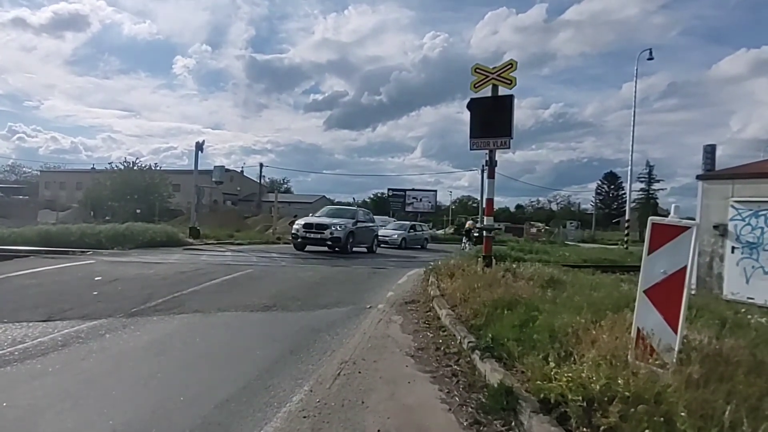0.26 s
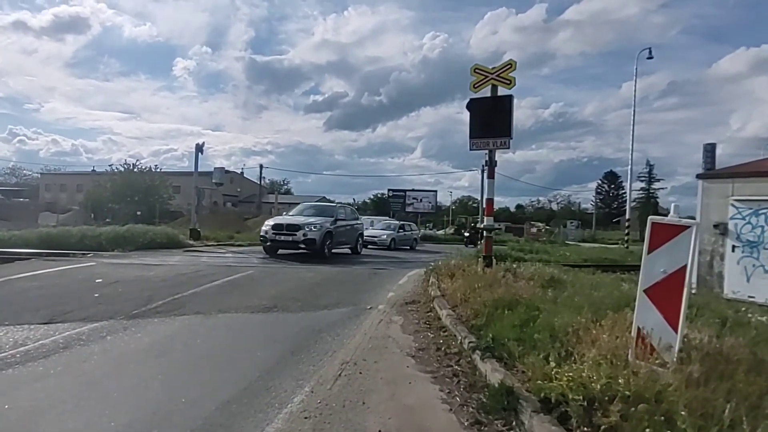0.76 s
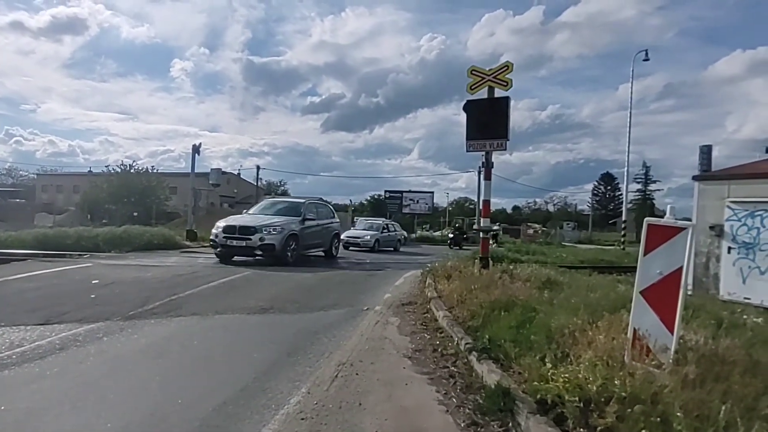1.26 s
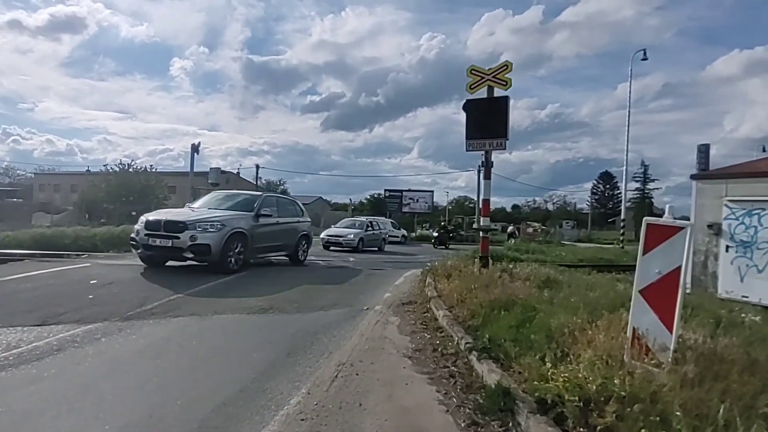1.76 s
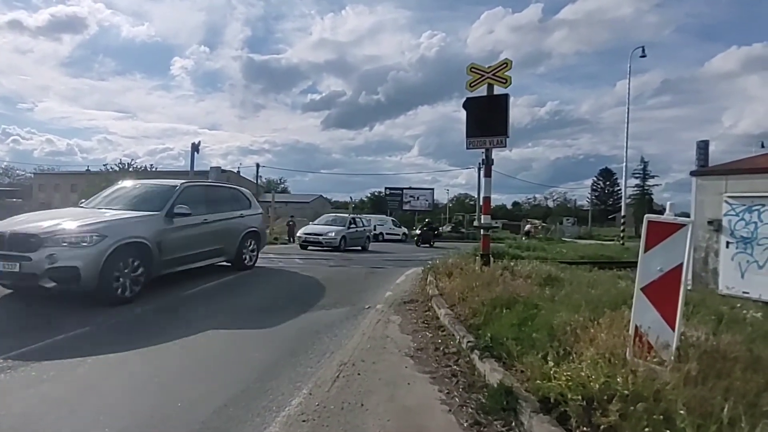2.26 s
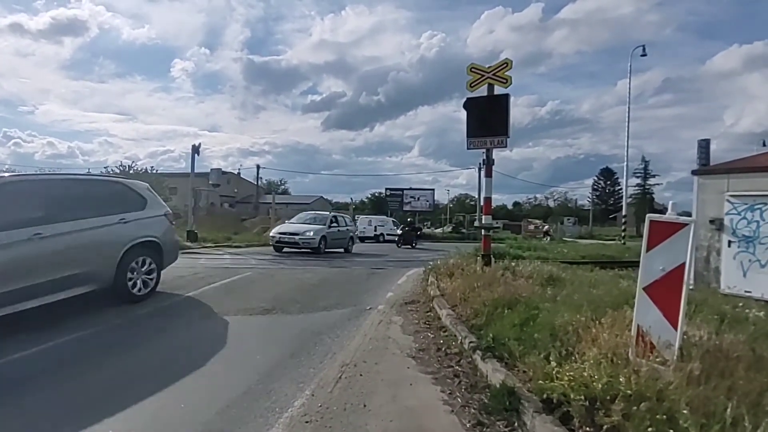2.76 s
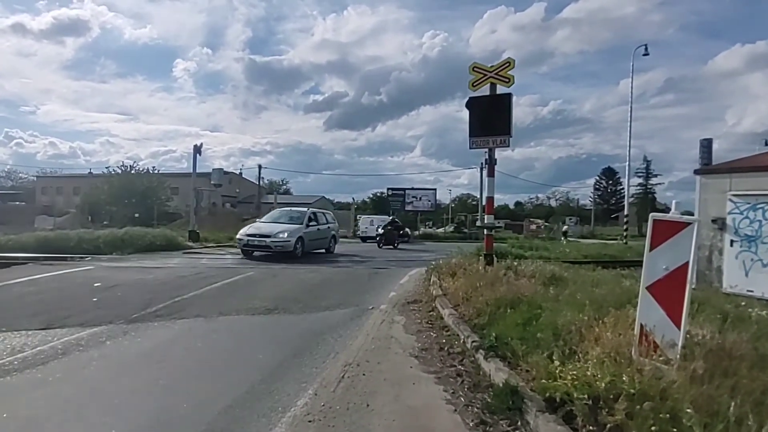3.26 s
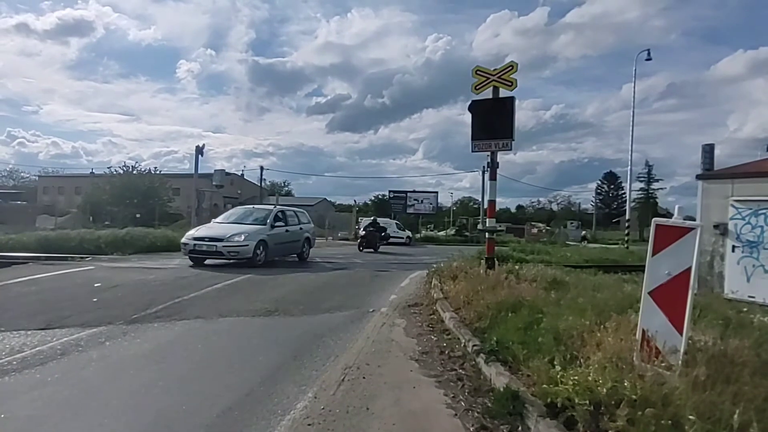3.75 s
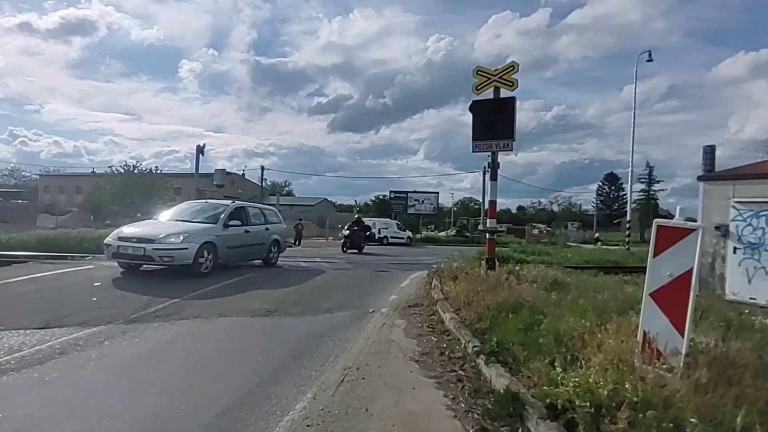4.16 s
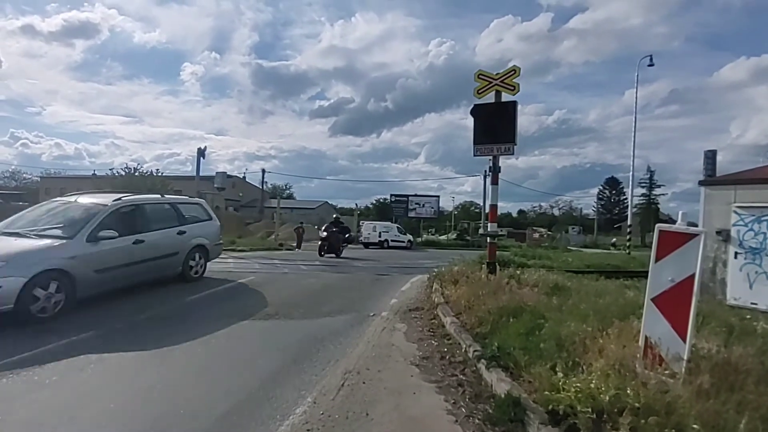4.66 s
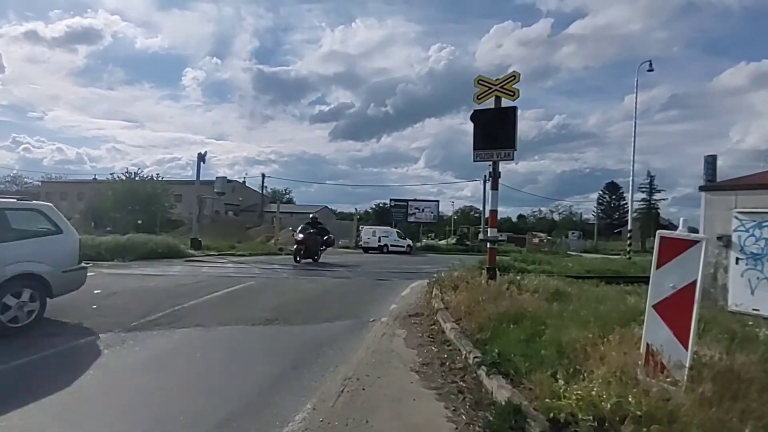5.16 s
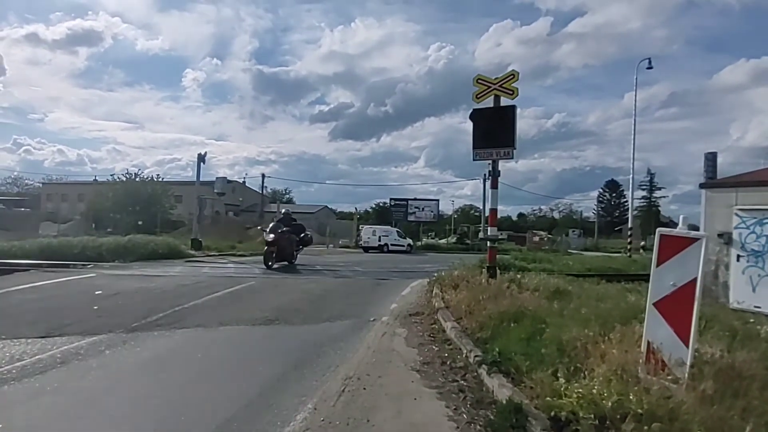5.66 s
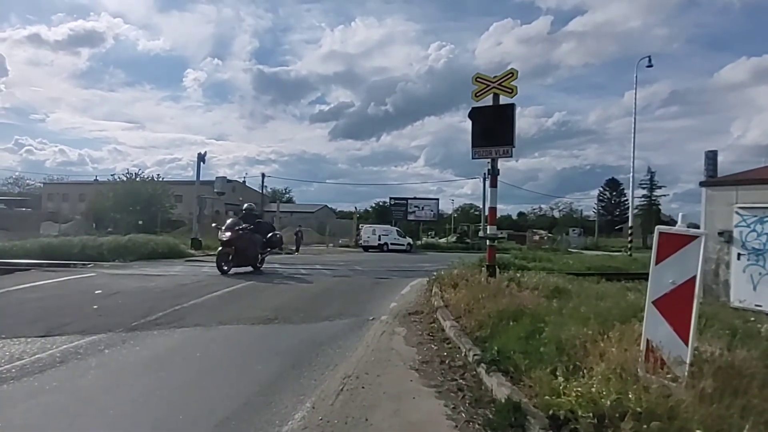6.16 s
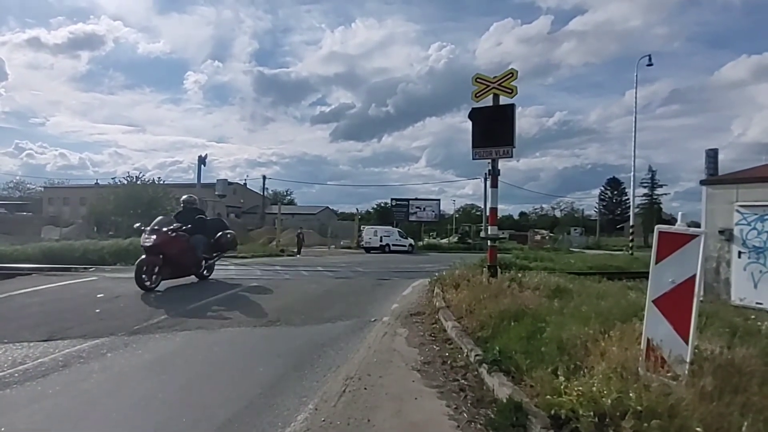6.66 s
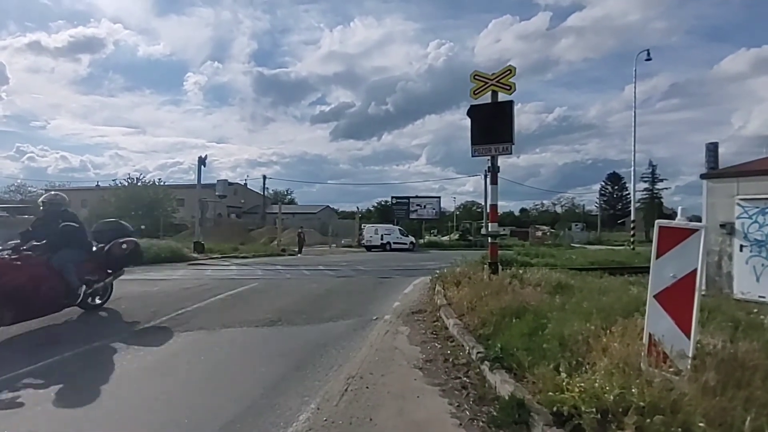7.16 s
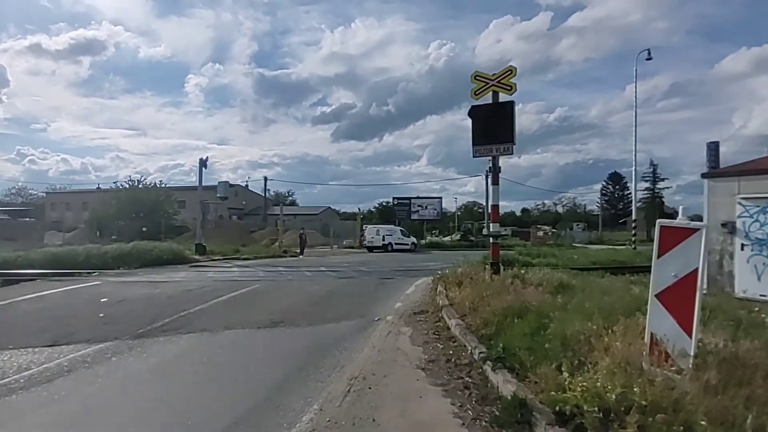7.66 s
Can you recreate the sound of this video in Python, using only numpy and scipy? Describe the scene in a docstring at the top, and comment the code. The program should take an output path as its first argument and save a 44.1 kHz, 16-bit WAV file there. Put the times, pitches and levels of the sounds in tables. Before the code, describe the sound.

Outdoors beside a level crossing, with a stationary stereo microphone close to the road. A large car's low engine dips for a gear change, then pulls and passes on the left with drumming, singing tyres and wheel knocks. A rattlier estate car follows with fuller tyre roar and hiss. Last, a motorcycle thumps over the rails and goes by, its deep exhaust throbbing, surging and booming as it leaves.

```python
"""Engines hum up in pitch and tyres roar and drum as a large car, an estate car and a motorcycle pull away
over a level crossing and pass on the left; wheels knock and the motorcycle's exhaust throbs.
Engines are sums of wavering firing lines, with rasp and exhaust puffs made from shaped noise and pulses.
Tyres are swelling bands of noise with thin singing lines; knocks are decaying sines with a noisy crack.
A moving comb of notches, the road's reflection, colours the tyres, rasp and hiss."""
import sys
import numpy as np
from scipy import signal
from scipy.fft import rfft, irfft, next_fast_len
from scipy.io import wavfile
from scipy.ndimage import map_coordinates

SR = 44100
rng = np.random.default_rng(int(sys.argv[2]) if len(sys.argv) > 2 else 0)


def file_out(sig):
    """Save sig as 16-bit WAV at sys.argv[1]."""
    # one column per channel
    cols = np.atleast_2d(sig).T
    # limit, then scale
    lim = np.clip(cols, -1, 1)
    pcm = np.round(lim * 32767).astype(np.int16)
    wavfile.write(sys.argv[1], SR, pcm)


N = 347949

# Levels in these tables are taken before the trims set in scene().
# Engine pitch: the large car sinks, climbs and levels off; the estate car climbs; the motorcycle climbs
# and eases at the end. Each row: time in seconds, pitch in Hz.
LARGE_CAR_PITCH = [(0, 84.7), (.25, 77.7), (.48, 67.5), (1, 85.05), (1.9, 98.02), (3.5, 100.3)]
ESTATE_CAR_PITCH = [(3.3, 56.68), (4, 65.44), (5, 74.57), (5.4, 79.95), (5.85, 81.9), (6.35, 88.3)]
MOTORCYCLE_PITCH = [(5.4, 47.3), (5.9, 48), (6.2, 50.4), (6.6, 53.45), (7, 58.04), (7.3, 61.3),
                    (7.48, 62.96), (7.66, 68.25), (7.89, 66.5)]
# Engine firing lines. Each row: multiple of the pitch, level in dB while approaching, level in dB once past.
LARGE_CAR_ORDERS = [(1, 1.5, -4), (1.5, -4.5, -31), (2, -8.5, 4.5), (2.5, -6.5, -3), (3, -19, -8.5),
                    (4, -14, -7), (5, -22, -9)]
ESTATE_CAR_ORDERS = [(1, -5.5, 5.5), (2, -2.5, 1.5), (3, 0.5, 0.5), (4, -10, -6), (5, -22, -12.5),
                     (6, -4, -11)]
MOTORCYCLE_ORDERS = [(2, 0, -6), (3, -12.5, -8.5), (4, -5.5, -12.5), (5, -15, -23), (6, -23.5, -19),
                     (7, -25.5, -18.5), (8, -21, -24.5)]
# The motorcycle's exhaust boom as it comes to point back. Each row: as for the firing lines.
BOOM_ORDERS = [(1, -7.5, 2.5), (1.27, -19, 4)]
# The large car's engine lifts off for a gear change, then pulls again. Each row: time in seconds, gain in dB.
GEAR_CHANGE = [(0, 3), (.2, 5.5), (.4, -2.5), (.56, -5), (.8, -0.5), (1.3, 2)]
# The motorcycle's engine note dips and surges. Each row: time in seconds, gain in dB.
SURGE = [(5.4, 0.5), (5.88, -3.5), (5.98, 1.5), (6.07, -7.5), (6.2, -2.5), (6.6, 2), (6.68, -4),
         (6.85, 1.5), (7.1, -0.5), (7.44, -0.5), (7.52, -3.5), (7.62, 2), (7.71, -1.5), (7.8, 2.5)]
DRONE_HZ, DRONE_ENDS_S = 165.3, 3.4  # a waiting engine's drone

# Exhaust throbs, one from the estate car, the rest from the motorcycle.
# Each row: loudest moment, rise and fall in seconds, level in dB.
THROBS = [(4.9, 0.46, 0.39, -37.5), (6.88, 0.075, .1, -30.5), (7.17, 0.08, 0.19, -30.5),
          (7.41, 0.095, 0.1, -27.5), (7.631, 0.082, 0.075, -27.5), (7.86, 0.23, .2, -26.5)]
# Resonance of the exhaust pipe. Each row: frequency in Hz, relative level in dB.
PIPE = [(25, -36), (45, -31), (62, -22), (82, -2), (110, -4.5), (160, -11.5), (240, -13.5), (300, -19.5),
        (450, -26.5), (800, -38.5), (2000, -77)]
# Spectrum of the motorcycle's drive sizzle, also used for grit. Each row: frequency in Hz, relative dB per Hz.
DRIVE = [(4500, -29), (5800, -13), (6700, -3), (8200, 3), (9700, -18), (12000, -3), (15500, -3.5)]
# The motorcycle's gear whine. Each row: time in seconds, pitch in Hz.
GEAR_PITCH = [(6.75, 1620), (6.97, 1590), (7.15, 1665), (7.36, 1686), (7.46, 1725), (7.5, 1901),
              (7.58, 1893), (7.65, 1980), (7.72, 1890), (7.8, 1930), (7.89, 1840)]
GEAR_DB, GEAR_LEAD_S = -50.5, .00014

# Spells of engine rasp, the first two the early 3 kHz ones. Each row: start, end, release, loudest moment
# and width in seconds, level in dB, left over right in dB.
RASPS = [(0, 1.7, 0.26, 1.22, 1.13, -51.5, 2.5), (1.72, 4.02, 0.32, 2.6, 2.6, -50, 11),
         (3.38, 5.74, 0.37, 4.1, 1.5, -38.5, -2), (5.62, 6.69, 0.04, 5.97, 0.9, -36, -3.5),
         (6.799, 7.25, 0.22, 6.7, 0.76, -45.5, 12), (7.5, 8.1, .1, 7.6, 0.42, -47.5, 7)]
RASP_ATTACK_S = 0.26
FLUTTER_MULTIPLE = 2 / 3  # rate of the early 3 kHz rasp's fluttering, against the first pitch track
# Rasp spectra, the early spells' and the later ones'. Each row: frequency in Hz, relative dB per Hz.
EARLY_RASP = [(1900, -30), (2350, -6), (2650, 9), (2950, 6.5), (3250, 2), (3520, -3.5), (3800, -32),
              (5000, -63)]
LATER_RASP = [(1500, -15.5), (2200, -14.5), (2650, -1.5), (2850, -2), (3020, -0.5), (3200, -2.5),
              (3450, -5.5), (3850, -12), (4300, -26), (6000, -65)]
# Engine parts ringing under load. Each row: loudest moment, rise and fall in seconds,
# level in dB, centre in Hz, climb in Hz per second, right over left in dB, width in Hz.
RINGS = [(.085, .015, 0.022, -52, 2020, 0, -0.5, 120), (1, 0.54, .4, -64, 2086, 1, -3, 71),
         (1.171, .3, 0.16, -53, 1530, 61, -3, 44.85), (1.162, .25, .2, -54.5, 3070, 0, -7, 70.5),
         (1.74, .16, 0.2, -50, 2905, 0.5, -4, 299), (3.501, 0.22, 0.98, -43.5, 3058, -59.5, -6, 120),
         (6.63, 0.1, 0.1, -47.5, 3054, 0, 1, 349)]

# Tyre swells on the rails, alongside and behind. Each row: loudest moment, rise and fall in seconds
# (drumming falls more slowly), drumming level in dB, tread roar level in dB, roar's right over left in dB.
TYRES = [(1.66, 0.16, 0.19, -41, -46.5, 2), (2.65, 1.386, 1, -35, -40, 3.5),
         (4.402, 1.46, 1.27, -35, -36.5, 3), (5.98, 0.19, 0.12, -53, -39, 3),
         (6.75, 1.76, 0.44, -35, -38.5, 2.5), (7.55, 0.47, 0.3, -50, -44, -1)]
# Tyre spectra, drumming and tread roar. Each row: frequency in Hz, relative dB per Hz.
DRUM = [(20, -35), (38, -18), (55, -2), (100, 0.5), (150, 0.5), (240, 4.5), (330, -1.5), (450, -2),
        (620, -8.5), (900, -24.5), (2000, -61)]
ROAR = [(350, -28), (600, -23), (850, -1), (1150, -0.5), (1450, -6), (1800, -6.5), (2300, -9), (3200, -21),
        (4300, -40), (7000, -60)]
# Climbing bands of tyre noise. Each row: loudest moment, rise and fall in seconds, level in dB,
# centre in Hz at the loudest moment, climb in Hz per second, right over left in dB.
CLIMBS = [(1.2, 1.2, 0.86, -50.5, 1580, 167.3, -1), (3.12, 0.46, 0.59, -42.5, 2108, 399, 22),
          (4.65, .75, 0.66, -42, 1812, 451.7, 9), (5.75, .5, 0.29, -41, 2383, 200, 14),
          (7.7, .35, 0.87, -48, 1988, 249.8, 4), (3.43, .12, 0.13, -60, 3950, 1410, 5)]
# Boom of the wheel arches. Each row: as for the climbing bands.
HOLLOW = [(3.35, .4, .85, -37.5, 598, 30, 2), (5.55, 0.58, .8, -38.5, 621.2, 10, 0.5)]
# Narrow singing of gears and tread patterns. Each row: as for the climbing bands, with pitch for centre.
WHINES = [(1.2, 1.5, 0.46, -53, 903, 67.5, -3), (1.98, .09, 0.09, -38.5, 297.6, 26, 0),
          (2.9, .12, 0.12, -38, 394.3, 26, -3), (3.981, .16, 0.086, -39.5, 887, 20.5, 2),
          (4.03, .24, 0.23, -37.5, 394, 70, 0), (4.45, .12, 0.31, -42.5, 1103, 90, 2),
          (6.92, .06, 0.067, -42, 1203, 0, 6), (7.1, .16, 0.13, -37.5, 492, 100.5, 5)]
# Tread noise reaches the left port first, by more once the traffic is alongside.
FAR_LEAD_S, NEAR_LEAD_S = .00008, .00025
# The large car's tyre chord. Each row: highest pitch in Hz, level in dB.
CHORD = [(340, -44), (425, -44), (545, -45.5), (590, -45), (618, -45), (665, -41), (750, -51), (840, -51)]
# Highest moment, time from it to drop by half an octave, then the swell's rise and fall.
CHORD_TOP_S, CHORD_BEND_S, CHORD_RISE_S, CHORD_FALL_S = 3.27, .72, 0.59, 0.32

# Knocks of wheels. Each row: time in seconds, # thud level in dB, thud pitch in Hz, thud 60 dB decay in
# seconds, slap level in dB.
KNOCKS = [(0.28, -27, 109, 0.18, -50), (1.004, -25, 225, 0.064, -39), (1.079, -31, 226, .03, -26),
          (2.271, -15, 285, 0.028, -15), (3.946, -26, 240, 0.025, -18), (4.0, -24, 203, 0.021, -11),
          (4.393, -12.5, 415, .018, -17), (5.913, -17, 189, .08, -23), (6.002, -7.5, 238, 0.025, -24),
          (6.035, -10, 198, 0.033, -36), (6.636, -15, 224.3, 0.084, -35.5), (6.802, -18, 305, 0.035, -16.5),
          (6.865, -16, 375, 0.044, -22)]
SLAP_HZ, SLAP_T60_S = 1000, 0.011
CRACK_DB, CRACK_T60_S, CRACK_HZ = -9, 0.011, 1600  # level against the slap, decay, low-pass corner
# Bits of grit ticking under the tyres. Each row: time in seconds, level in dB.
TICKS = [(.1, -64), (.39, -68), (1.824, -60), (6.823, -55), (7.14, -50), (7.37, -55)]
TICK_T60_S = .04

# Swells of air hiss. Each row: loudest moment, rise and fall in seconds, level in dB, right over left in dB.
HISSES = [(1.852, 0.34, 1.6, -66, 2), (3.65, 0.79, 0.46, -60, 6.5), (4.6, 0.6, 1.26, -58.5, 4),
          (6.03, 0.39, 0.2, -51, 22), (6.56, 0.16, 0.17, -61, 10), (7.7, 0.87, 1.2, -64, -8)]
FAR_HISS_DB = -79  # distant traffic, before the hiss trim
# Swells of fine sizzle. Each row: loudest moment, rise and fall in seconds, level in dB.
SIZZLES = [(2.6, 0.65, 1.5, -71), (4.55, 0.98, 1.6, -61.5), (6.1, 0.47, 0.73, -62.5), (7.5, .9, 1, -75)]
# Spectra of hiss and sizzle. Each row: frequency in Hz, relative dB per Hz.
HISS = [(1500, -27), (2800, 6.5), (3700, 14.5), (4500, 8.5), (5500, 3.5), (7000, 1.5), (8300, 1),
        (10000, -2), (12000, -4), (15500, -10)]
SIZZLE = [(6500, -30), (8200, -1), (10500, -8), (12000, -1), (13300, 3), (15500, -0.5)]

# Notches from the road's reflection. Each row: deepest moment, rise and fall in seconds, depth in dB,
# lowest notch in Hz at the deepest moment, climb in Hz per second.
NOTCHES = [(1.0, 1, 0.73, 17.5, 627, 31), (5.22, 0.22, 0.14, 3, 840, 30), (7.68, 0.42, 0.085, 8, 1456, -92)]
# Teeth of the notch comb. Each row: multiple of the lowest notch, width in multiples, share of the depth.
COMB = [(1, 0.085, 1), (3.55, 0.77, 0.71), (5.7, 0.43, 0.77), (6.7, .6, 0.27)]
# Likeness of noise at the two ports. Each row: frequency in Hz, correlation.
ALIKE = [(60, 0.99), (250, 1), (500, 1), (900, 0.96), (1400, 0.57), (2100, 0.6), (3000, 0.67),
         (4500, 0.098), (12000, 0.064)]
FALLOFF = 2.3  # far from its loudest moment, a passing sound falls as distance to this power
TOP_HZ = 15550  # upper band limit


def engine(track, orders, passes_s, rise_s, fall_s, level_db, rough, flutter, smear):
    """Firing lines waver, the upper ones smeared most, and shift from intake to exhaust in passing."""
    cycle = turns(curves(track)[0] * (1 + flutter * wobble(18)))
    past = passed(passes_s, over_s=0.33)
    hum = np.zeros(N)
    for multiple, front_db, rear_db in orders:
        strength = amp(front_db + past * (rear_db - front_db)) * (1 + rough * wobble(22))
        phase = 2 * np.pi * (multiple * cycle + rng.random()) + smear * multiple * wobble(30)
        hum += strength * np.sqrt(2) * np.sin(phase)
    passing = swell(np.arange(N) / SR, passes_s, rise_s, fall_s)
    return hum * amp(level_db) * passing * present(track[0][0], track[-1][0])


def firing_gate(track, depth, multiple=1):
    """A gain that pulses at a multiple of a pitch track."""
    pulse = np.cos(2 * np.pi * multiple * turns(curves(track)[0]))
    return 1 + depth * present(track[0][0], track[-1][0]) * pulse


def exhaust(level_db, scatter_s):
    """Uneven puffs, two per cycle of the motorcycle's pitch, boom in the pipe."""
    t = np.arange(N) / SR
    # ahead of the motorcycle's own spell its first pitch is held, which serves the estate car's throb
    half_cycle = np.floor(2 * turns(curves(MOTORCYCLE_PITCH)[0]))
    at = np.flatnonzero(np.diff(half_cycle))
    size, late = rng.standard_normal((len(at), 2)).T
    landing = np.clip(at + late * scatter_s * SR, 0, N - 1).astype(int)
    puffs = np.bincount(landing, np.tanh(size), N)
    throb = together(amp(db + level_db) * swell(t, s, rise, fall) for s, rise, fall, db in THROBS)
    return throb * unit(filtered(puffs, lambda hz: amp(along(PIPE, hz))))


def drive(level_db, loudest_s, rise_s, fall_s, depth):
    """A bright sizzle pulses with the motorcycle's engine, heard from the side and behind."""
    gain = swell(np.arange(N) / SR, loudest_s, rise_s, fall_s)
    gain = gain * passed(6.76, over_s=.06) * firing_gate(MOTORCYCLE_PITCH, depth)
    return gain * amp(level_db + 1.5 * wobble(25)) * panned(right_db=-10) * rush(DRIVE)


def gear_whine(loudest_s, rise_s, fall_s, right_db):
    """The motorcycle's gears whine, wavering, as it goes by."""
    line = tone(curves(GEAR_PITCH)[0], waver=.004, flicker_db=3)
    line = line * present(GEAR_PITCH[0][0], GEAR_PITCH[-1][0])
    return amp(GEAR_DB) * panned(right_db) * swell(np.arange(N) / SR, loudest_s, rise_s, fall_s) * line


def rasp(level_db):
    """Injectors and valves make bands of noise that flutter in level while engine parts ring."""
    t = np.arange(N) / SR
    spells = [amp(db) * panned(-left_db) * swell(t, s, width, width) * present(start, end, RASP_ATTACK_S, release)
              for start, end, release, s, width, db, left_db in RASPS]
    early = firing_gate(LARGE_CAR_PITCH, depth=0.23, multiple=FLUTTER_MULTIPLE)
    later = firing_gate(ESTATE_CAR_PITCH, depth=0.092) * firing_gate(MOTORCYCLE_PITCH, depth=0.07)
    noise = together(spells[:2]) * early * rush(EARLY_RASP)
    noise += together(spells[2:]) * later * rush(LATER_RASP)
    ringing = sum(amp(2.3 * wobble(30)) * gliding_band(row, width_hz=width, alike=0.36) for *row, width in RINGS)
    noise += early * later * ringing
    return arrive(amp(level_db + 0.29 * wobble(16) + 0.92 * wobble(55)) * noise, lead_s=.00035)


def tyres(drum_db, roar_db, climb_db, hollow_db, whine_db, drum_lingers):
    """Carcasses drum and tread blocks roar, shaken by the uneven road; the drumming outlasts the roar."""
    t = np.arange(N) / SR
    drum = together(amp(db) * swell(t, s, rise, fall * drum_lingers) for s, rise, fall, db, _, _ in TYRES)
    roar = together(amp(db) * panned(side) * swell(t, s, rise, fall) for s, rise, fall, _, db, side in TYRES)
    bumps = wobble(14)  # shared by both parts
    low = drum * amp(drum_db + 0.64 * bumps + 0.93 * wobble(45)) * rush(DRUM)
    low += amp(hollow_db) * sum(gliding_band(row, width_hz=220, alike=0.4) for row in HOLLOW)
    low += amp(whine_db) * sum(whine(row) for row in WHINES)
    tread = roar * amp(roar_db + 0.63 * bumps + 0.81 * wobble(120)) * rush(ROAR)
    tread += amp(climb_db) * sum(gliding_band(row, width_hz=270, alike=0.23) for row in CLIMBS)
    lead = FAR_LEAD_S + (NEAR_LEAD_S - FAR_LEAD_S) * passed(2.31, over_s=0.41)
    return arrive(low * amp([[-.2], [.2]]), lead_s=0.00014) + arrive(tread, lead)


def whine(row):
    """One thin line swells while its pitch glides steadily."""
    s, rise, fall, db, hz, climb, right_db = row
    t = np.arange(N) / SR
    line = tone(hz + climb * np.clip(t - s, -2 * rise, 2 * fall), waver=.007, flicker_db=2)
    return amp(db) * panned(right_db) * swell(t, s, rise, fall) * line


def tyre_chord(level_db, right_db):
    """All notes of the large car's tread bend up and down together along one arch."""
    t = np.arange(N) / SR
    bend = 1 / np.hypot(1, (t - CHORD_TOP_S) / CHORD_BEND_S)
    notes = sum(amp(db) * tone(hz * bend, waver=.005, flicker_db=2.5) for hz, db in CHORD)
    return amp(level_db) * panned(right_db) * swell(t, CHORD_TOP_S, CHORD_RISE_S, CHORD_FALL_S) * notes


def knocks(level_db):
    """Each knock is a low thud and a brief slap with a broad crack."""
    out = np.zeros(N + SR)
    t = np.arange(SR // 4) / SR
    soften = signal.butter(2, CRACK_HZ, fs=SR)

    def ring(db, hz, t60):
        """A decaying sine with a softened onset."""
        return amp(db + level_db - 60 * t / t60) * np.sin(2 * np.pi * hz * t) * (1 - np.exp(-2 * hz * t))

    for s, thud_db, hz, t60, slap_db in KNOCKS:
        grain = unit(signal.lfilter(*soften, rng.standard_normal(len(t))))
        crack = amp(slap_db + CRACK_DB - 60 * t / CRACK_T60_S) * grain
        blow = ring(thud_db, hz, t60) + ring(slap_db, SLAP_HZ, SLAP_T60_S)
        blow += signal.lfilter(*soften, crack)  # softened again after its sharp onset
        out[round(s * SR):][:len(t)] += blow
    return out[:N]


def ticks():
    """Each bit of grit is a tiny bright burst."""
    t = np.arange(N) / SR
    bursts = sum((t >= s) * amp(db - 60 * np.abs(t - s) / TICK_T60_S) for s, db in TICKS)
    return bursts * rush(DRIVE)


def air(hiss_db, sizzle_db):
    """Air hisses out of the tread grooves, with a fine gritty sizzle on top."""
    t = np.arange(N) / SR
    swells = [amp(db) * panned(side) * swell(t, s, rise, fall) for s, rise, fall, db, side in HISSES]
    grit = together(amp(db) * swell(t, s, rise, fall) for s, rise, fall, db in SIZZLES)
    hiss = together(swells + [amp(FAR_HISS_DB)])
    hiss = hiss * amp(hiss_db + 0.71 * wobble(18) + 1.1 * wobble(400)) * rush(HISS)
    return hiss + grit * amp(sizzle_db + 1.5 * wobble(18) + 2.3 * wobble(900)) * rush(SIZZLE)


def ground_comb(x):
    """Direct sound and its bounce off the road cancel in bands that move over time."""
    hz, t, z = signal.stft(x, SR, nperseg=1024)
    for s, rise, fall, depth_db, lowest, climb in NOTCHES:
        multiple = hz[:, None] / (lowest + climb * (t - s))
        dips = sum(share * np.exp(-((multiple - k) / width) ** 2) for k, width, share in COMB)
        z = z * amp(-depth_db * swell(t, s, rise, fall) * dips)
    return signal.istft(z, SR, nperseg=1024)[1][:, :N]


def gliding_band(row, width_hz, alike):
    """Stereo noise in one resonance swells while its centre glides steadily."""
    s, rise, fall, db, hz, climb, right_db = row
    t = np.arange(N) / SR
    carrier = 2 * np.pi * turns(hz + climb * np.clip(t - s, -2 * rise, 2 * fall))
    cos, sin = np.cos(carrier), np.sin(carrier)
    mid, side = [wobble(2 * width_hz) * cos + wobble(2 * width_hz) * sin for _ in range(2)]
    side = side * np.tan(np.arccos(np.clip(alike, 0, 1)) / 2)
    stereo = unit(np.array([mid + side, mid - side]))
    return amp(db) * panned(right_db) * swell(t, s, rise, fall) * stereo


def rush(spectrum):
    """Stereo noise of rms 1, alike at both ports in the bass and nearly unrelated in the top treble."""
    def response(hz):
        turn = np.arccos(np.clip(along(ALIKE, hz), -1, 1)) / 2
        return amp(along(spectrum, hz)) * [np.cos(turn), np.sin(turn)]
    mid, side = filtered(rng.standard_normal((2, N)), response)
    return unit(np.array([mid + side, mid - side]))


def tone(hz, waver, flicker_db):
    """A thin line of rms 1, unsteady in pitch and strength."""
    line = np.sin(2 * np.pi * turns(hz * (1 + waver * wobble(25))))
    return unit(amp(flicker_db * wobble(16)) * line)


def swell(t, loudest_s, rise_s, fall_s):
    """Gain of a sound that draws near, peaks at 1 and recedes."""
    away = (t - loudest_s) / np.where(t < loudest_s, rise_s, fall_s)
    return (1 + away ** 2) ** (-FALLOFF / 2)


def passed(at_s, over_s):
    """A smooth step from 0 to 1 as a vehicle goes by."""
    return (1 + np.tanh((np.arange(N) / SR - at_s) / over_s)) / 2


def present(start_s, end_s, attack_s=0.35, release_s=0.24):
    """Gain of 1 from start to end, fading in before and away after."""
    t = np.arange(N) / SR
    early = np.maximum(0, start_s - t) / attack_s
    late = np.maximum(0, t - end_s) / release_s
    return np.exp(-early ** 2 - late ** 2)


def arrive(x, lead_s):
    """Sound from the left reaches the right port later."""
    left, right = np.broadcast_to(x, (2, N))
    n = np.arange(N)
    return np.array([left, np.interp(n - lead_s * SR, n, right)])


def panned(right_db):
    """Gains of the two ports, with the right one louder by right_db."""
    return unit(amp([[-right_db / 2], [right_db / 2]]))


def together(gains):
    """Unrelated noises add in power."""
    return np.sqrt(sum(g ** 2 for g in gains))


def wobble(rate):
    """A smooth random curve through rate knots a second."""
    coarse = np.arange(0, N, 32)
    knots = rng.standard_normal(int(N * rate / SR) + 4)
    return np.interp(np.arange(N), coarse, map_coordinates(knots, [coarse * rate / SR]))


def turns(hz):
    """Cycles completed at a changing rate."""
    return np.cumsum(hz) / SR


def curves(rows):
    """One value per sample for each column after the time."""
    s, *cols = np.transpose(rows)
    return [np.interp(np.arange(N) / SR, s, c) for c in cols]


def filtered(x, response):
    """Shape the spectrum of x by a response of frequency."""
    m = next_fast_len(N + SR // 2)
    return irfft(rfft(x, m) * response(np.fft.rfftfreq(m, 1 / SR)), m)[..., :N]


def along(points, hz):
    """Read (Hz, value) points on a log frequency axis."""
    f, v = np.transpose(points)
    return np.interp(np.log(hz + 1), np.log(f + 1), v)


def amp(db):
    """Decibels to gain."""
    return 10 ** (np.asarray(db) / 20)


def unit(x):
    """Scale to rms 1."""
    return x / np.sqrt(np.mean(x ** 2) + 1e-20)


def scene():
    """Mix engines, exhaust and knocks with tyres, rasp and air reflected off the road."""
    hum = engine(LARGE_CAR_PITCH, LARGE_CAR_ORDERS, passes_s=2.45, rise_s=2.4, fall_s=0.83,
                 level_db=-42.5, rough=0.21, flutter=0.0038, smear=0.13)
    hum *= amp(curves(GEAR_CHANGE)[0])
    hum += engine(ESTATE_CAR_PITCH, ESTATE_CAR_ORDERS, passes_s=4.42, rise_s=0.95, fall_s=2.6,
                  level_db=-37.0, rough=0.1, flutter=0.0032, smear=0.086)
    bike = engine(MOTORCYCLE_PITCH, MOTORCYCLE_ORDERS, passes_s=7.3, rise_s=3.0, fall_s=1.5,
                  level_db=-27.0, rough=0.24, flutter=0.003, smear=0.088)
    bike += engine(MOTORCYCLE_PITCH, BOOM_ORDERS, passes_s=7.62, rise_s=0.99, fall_s=.45,
                   level_db=-25.0, rough=0.14, flutter=0.0098, smear=.15)
    hum += bike * amp(curves(SURGE)[0])
    waiting_pitch = [(0, DRONE_HZ), (DRONE_ENDS_S, DRONE_HZ)]
    waiting_orders = [(1, -11.0, 1), (2, -6.5, -7), (5, -9.5, -7.0)]
    hum += engine(waiting_pitch, waiting_orders, passes_s=0.67, rise_s=2.3, fall_s=3.1,
                  level_db=-48.5, rough=0.34, flutter=0.0054, smear=0.13)
    bass = hum + exhaust(level_db=2.5, scatter_s=0.00062) + knocks(level_db=0.0)
    bass = arrive(bass, lead_s=0.00022) * amp([[-.2], [.2]])
    singing = arrive(tyre_chord(level_db=-0.5, right_db=5), NEAR_LEAD_S)
    singing += arrive(gear_whine(loudest_s=7.7, rise_s=1.79, fall_s=0.6, right_db=2), GEAR_LEAD_S)
    bright = drive(level_db=-61, loudest_s=7.87, rise_s=1.2, fall_s=.7, depth=0.26) + ticks()
    road = tyres(drum_db=2.5, roar_db=4.0, climb_db=3.5, hollow_db=1, whine_db=-0.5, drum_lingers=1.65)
    reflected = ground_comb(road + rasp(level_db=1.5) + air(hiss_db=6, sizzle_db=0.5))
    return bass + singing + bright + reflected


def record(dry):
    """Fade both ends to avoid clicks and remove everything above the band limit."""
    n = np.arange(N)
    ends = np.minimum(1, np.minimum(n, n[::-1]) / (.004 * SR))
    return filtered(dry * np.sin(np.pi / 2 * ends) ** 2, lambda hz: hz < TOP_HZ)


dry = scene()
out = record(dry)
file_out(out)
```